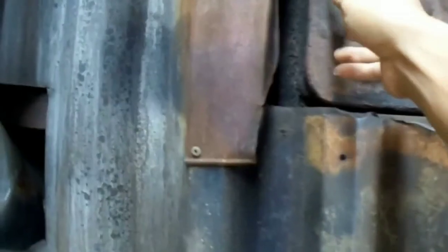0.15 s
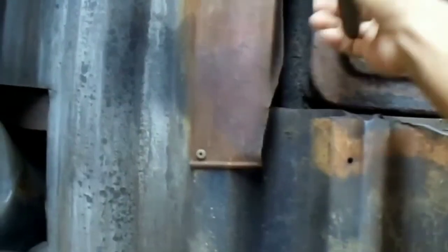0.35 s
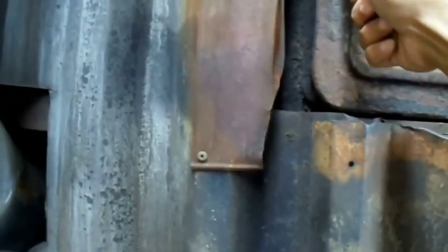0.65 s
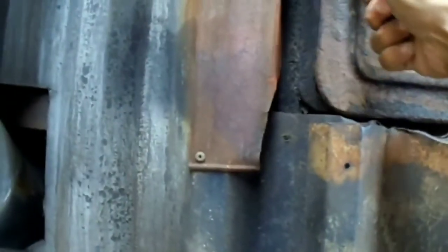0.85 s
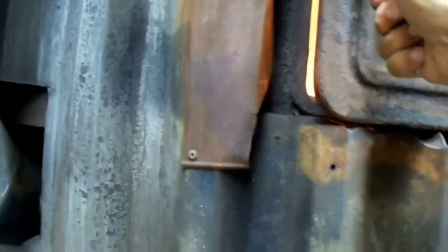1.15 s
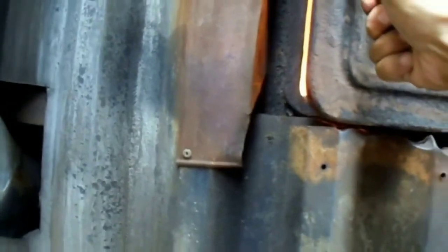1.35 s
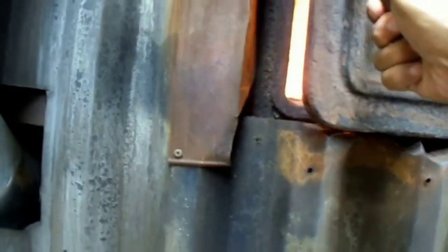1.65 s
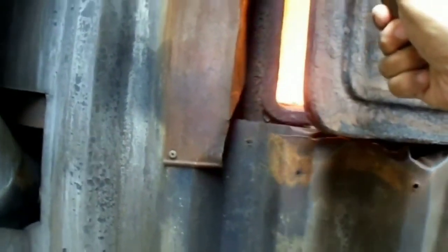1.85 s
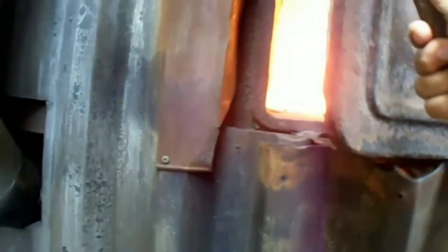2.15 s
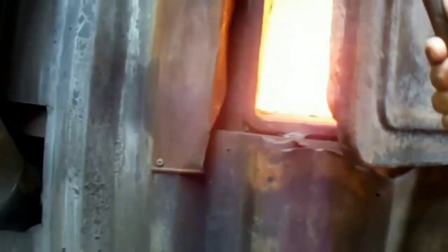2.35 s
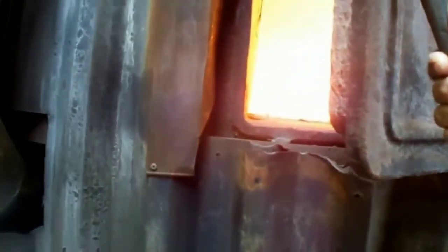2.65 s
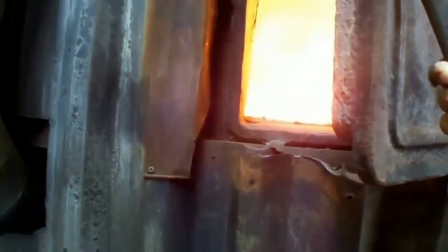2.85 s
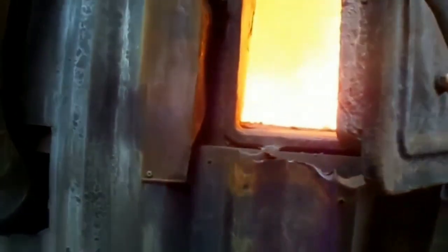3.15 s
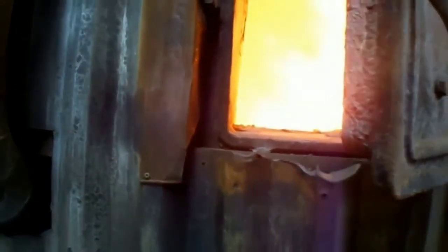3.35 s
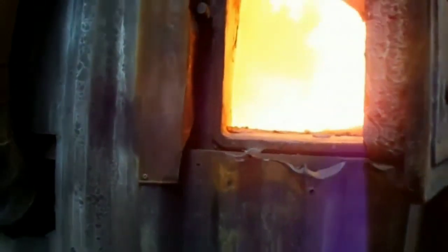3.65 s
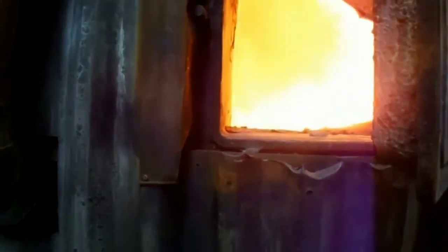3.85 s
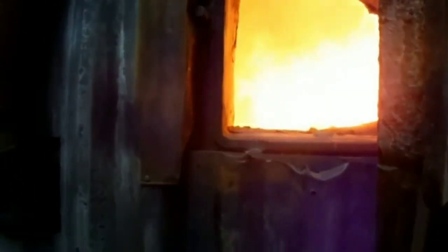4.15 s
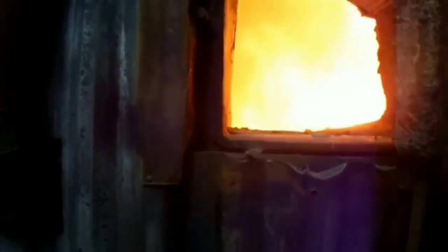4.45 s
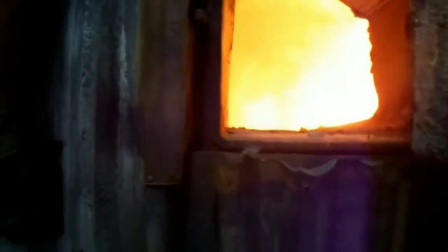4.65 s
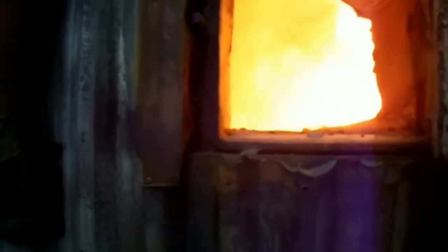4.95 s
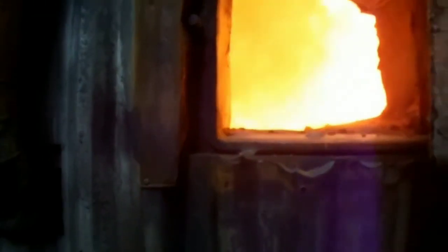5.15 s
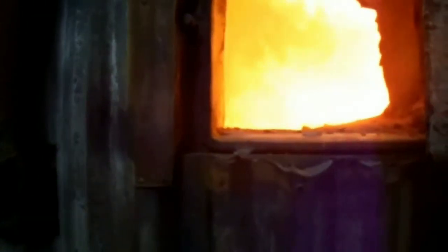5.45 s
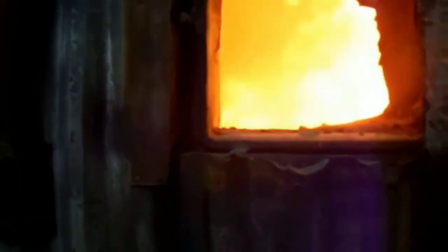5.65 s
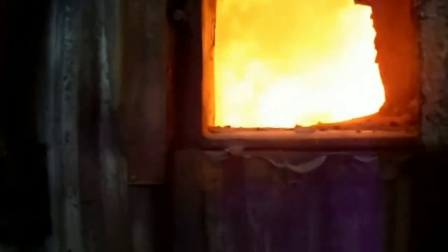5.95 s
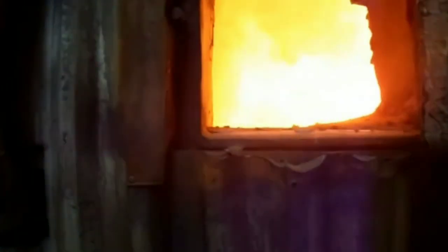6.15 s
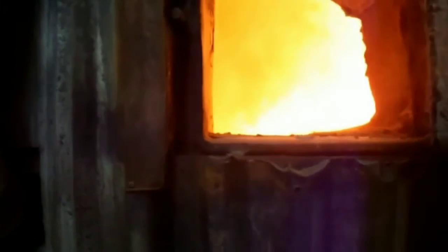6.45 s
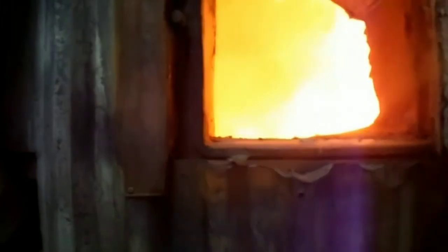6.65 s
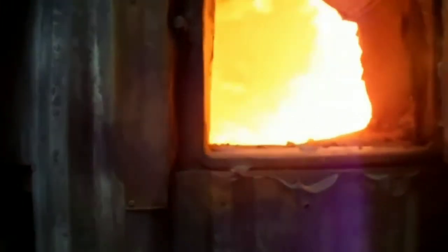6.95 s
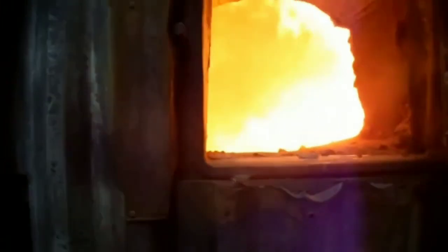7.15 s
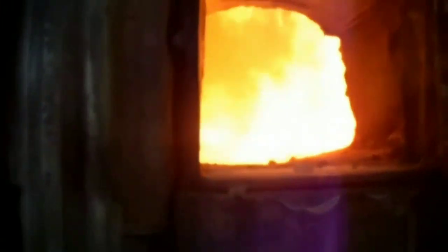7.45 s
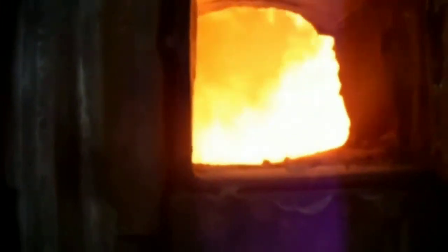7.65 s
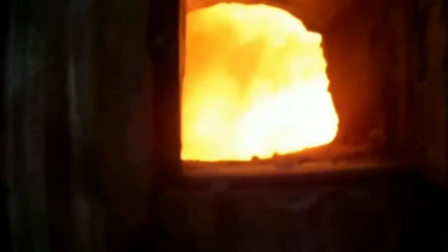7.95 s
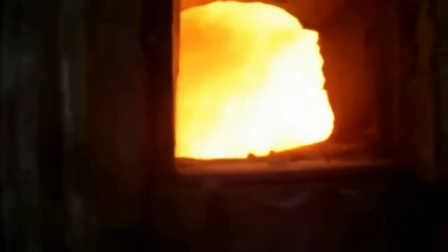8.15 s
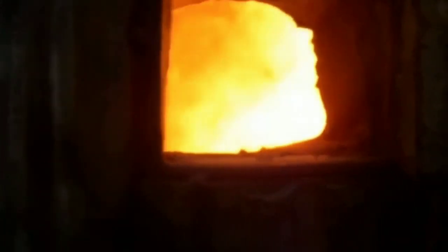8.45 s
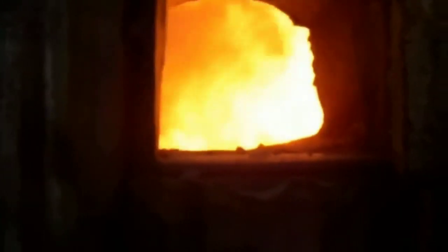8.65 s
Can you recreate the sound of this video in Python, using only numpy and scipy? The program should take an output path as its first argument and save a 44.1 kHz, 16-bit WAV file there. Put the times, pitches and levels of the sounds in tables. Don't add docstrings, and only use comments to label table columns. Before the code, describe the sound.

Close handheld pickup beside an industrial furnace: continuous rushing air and fans, low hum, piercing but quiet rotor whine. The iron door scrapes and groans softly, then bangs in clustered, distorted metallic blows with a rattling handle and short hard reverberation. The plant noise ducks under the blows and swells back. Finally the roar continues with isolated snaps and a small flurry of coal crackles.

```python
import sys
import numpy as np
from scipy import signal
from scipy.io import wavfile
from scipy.ndimage import uniform_filter1d

SR = 44100
rng = np.random.default_rng(int(sys.argv[2]) if len(sys.argv) > 2 else 0)


def boost(x):
    u = np.asarray(x, float) / 20
    return 10 ** u


def transcribe(signal):
    frames = np.atleast_2d(signal).T
    limited = np.clip(frames, -1, 1)
    pcm = np.round(limited * 32767).astype(np.int16)
    wavfile.write(sys.argv[1], SR, pcm)


N = 388080

# (time [s], body level [dB], edge level [dB], rattle T60 [s])
BLOWS = [(2.163, -12, -7.5, 0.11), (2.187, -7, -8, 0.11), (2.202, -25, -12.5, 0.057),
         (2.351, -11, -18, 0.18), (2.358, -6, -7.5, 0.17), (2.392, -11, -16, 0.15), (2.444, -11, -5, 0.17),
         (2.457, -7.5, -8, 0.15), (3.143, -25, -29.5, 0.15), (3.225, -19, -13.5, 0.2),
         (3.241, -2.5, -6, 0.17), (3.276, -7.5, -22, 0.14), (3.31, -19.5, -24.5, 0.7),
         (3.54, -28, -29, 0.15), (3.623, -3.5, -6, 0.14), (3.633, -8.5, -15, 0.15),
         (3.695, -21, -27.5, 0.39), (3.77, -20.5, -28.5, 0.33), (4.531, -8, -12, 0.4),
         (4.565, -14.5, -5.5, 0.28), (4.582, -7.5, -12, 0.3), (4.625, -18, -23, 0.13),
         (4.723, -17, -24.5, 0.14)]
# (frequency [Hz], width [Hz], level [dB])
BODY_MODES = [(153, 30, -8), (201, 73, -2.5), (393, 83, -2), (484, 220, -3), (560, 120, 3), (680, 150, -7),
              (694, 320, -1.5), (809, 140, 0), (915, 120, -9.5), (1052, 95, -6), (324, 53, -11.5),
              (1180, 580, -10.5)]
# (frequency [Hz], width [Hz], level [dB])
EDGE_MODES = [(1416, 300, 4.5), (1690, 190, 3.5), (1950, 220, 9.5), (2220, 120, 9.5), (2496, 310, 8),
              (2880, 840, 0), (3085, 800, -5.5), (3400, 540, 3.5), (3660, 240, 3), (4030, 180, 1.5),
              (4370, 490, -10), (4680, 1200, -6.5), (4850, 390, -14.5), (5230, 450, -14.5),
              (6000, 400, -39)]
# (time [s], level [dB], frequency [Hz])
THUDS = [
    (2.453, -27, 40),
    (3.246, -27, 65),
    (4.566, -19, 36),
    (4.575, -29, 205),
]


def door():
    out = np.zeros(N)
    for s, body_db, edge_db, t60 in BLOWS:
        body = struck(BODY_MODES, detune=0.035, uneven_db=4.5)
        add(out, s, boost(body_db) * signal.fftconvolve(burst(t60), body))
        edge = struck(EDGE_MODES, detune=0.023, uneven_db=-0.5)
        add(out, s, boost(edge_db) * signal.fftconvolve(burst(t60), edge))
    t = np.arange(16000) / SR
    for s, db, hz in THUDS:
        envelope = boost(db - 60 * t / 0.14) * (1 - np.exp(-t / 0.0075))
        add(out, s, envelope * np.sin(2 * np.pi * hz * t))
    return out


# (time [s], frequency [Hz], level [dB])
RINGS = [(2.163, 694, -5.5), (2.187, 697, -0.5), (2.358, 660, -11), (2.39, 560, -13), (2.46, 549, -17.5),
         (2.444, 1887, -12), (2.457, 2196, -14.5), (3.142, 281, -28), (3.225, 790, -8), (3.241, 570, -13.5),
         (3.276, 393, -7.5), (3.624, 1970, -8.5), (3.633, 520, -11.5), (4.531, 610, -9), (4.54, 794, -9.5),
         (4.58, 700, -12.5), (4.565, 2223, -12), (4.582, 2100, -9.5), (4.624, 1927, -16.5)]


def rings(t60_s=.19, reference_hz=700, slope=0.55):
    out, t = np.zeros(N), np.arange(16000) / SR
    for s, hz, db in RINGS:
        decay_db = 60 * t / t60_s * (hz / reference_hz) ** slope
        envelope = boost(db - decay_db) * (1 - np.exp(-t / 0.00059))
        add(out, s, envelope * np.sin(2 * np.pi * hz * t))
    return out


# (frequency [Hz], width [Hz], level [dB])
HINGE_MODES = [(199.5, 44, 2.5), (253.6, 55, 1.3), (318, 75, -1), (392.6, 110, -3.5), (560, 320, -6.5),
               (700, 63, -15), (900, 400, -11)]
# (time [s], length [s], frequency [Hz])
MOANS = [
    (1.56, .3, 312),
    (1.66, .2, 195),
    (1.87, .15, 620),
    (2.07, .1, 290),
    (2.9, .12, 270),
    (3.15, .08, 280),
    (3.3, .3, 205),
    (3.66, .25, 245),
    (4.74, .08, 800),
]
MOANS_DB = [-24, -25.5, -25, -24.5, -29, -21.5, -28, -34, -38]


def hinge(slips_per_s=1500):
    slips = (rng.random(N) < slips_per_s / SR) * rng.standard_normal(N)
    out = load() * evened(signal.oaconvolve(slips, struck(HINGE_MODES))[:N])
    for (s, length, hz), db in zip(MOANS, MOANS_DB):
        rub = rng.standard_normal(SR)[:round(length * SR)]
        rub = rub * signal.windows.tukey(len(rub), .6)
        add(out, s, boost(db) * signal.fftconvolve(rub, struck([(hz, 60, 0)])))
    return out


# (start [s], held [s], grind level [dB])
PUSHES = [
    (1.04, 0.032, -24.5),
    (1.88, .34, -25),
    (2.95, 0.076, -39),
    (3.181, .14, -24),
    (3.42, .17, -27),
    (3.68, 0.22, -33),
    (4.721, 0.062, -24),
]


def load(rise_db_per_s=53, fall_db_per_s=34):
    t = np.arange(N) / SR
    total = np.zeros(N)
    for s, held, db in PUSHES:
        before = np.maximum(s - t, 0)
        after = np.maximum(t - s - held, 0)
        total += boost(db - rise_db_per_s * before - fall_db_per_s * after)
    return total


# (time [s], level [dB], frequency [Hz])
LATCH = [
    (2.162, -18, 3270),
    (2.203, -44, 5200),
    (2.361, -16.5, 4640),
    (3.226, -23, 3265),
    (3.277, -19.5, 4560),
    (3.64, -22, 4600),
    (4.533, -20.5, 4350),
    (4.564, -3, 5040),
    (4.566, -10, 3800),
    (4.597, -14.5, 4660),
]


def latch():
    out = np.zeros(N)
    for s, db, hz in LATCH:
        tick(out, s, db, hz, 0.2 * hz, 0.046)
    return out


# (time [s], level [dB], frequency [Hz])
SNAPS = [(2.164, -5, 2610), (2.447, -6, 2100), (4.539, -6.5, 900), (2.199, -14, 5200), (3.229, -16, 3560),
         (3.277, -17, 4800), (6.198, -14, 2430), (6.198, -19, 4950), (6.199, -27, 3600), (7.478, -21, 3030),
         (7.629, -21, 4330), (7.856, -14, 3680)]


def snaps():
    out = np.zeros(N)
    for s, db, hz in SNAPS:
        tick(out, s, db, hz, 0.23 * hz, 0.0086)
    return out


# (time [s], level [dB], frequency [Hz], T60 [s])
LUMPS = [(4.179, -38, 3500, 0.028), (4.312, -30, 3170, 0.065), (4.328, -28, 4400, 0.03),
         (4.392, -33, 3900, .034), (7.427, -20.5, 3360, 0.055), (7.437, -14.5, 600, .05),
         (7.44, -19.5, 1500, 0.11), (7.63, -23.5, 3900, .07), (7.631, -21, 1500, 0.037),
         (7.632, -16, 600, 0.055), (7.671, -27, 3630, .06), (7.734, -27, 4850, 0.025),
         (7.84, -21, 4020, .04), (7.85, -19.5, 4370, 0.085), (7.959, -29.5, 4240, .063),
         (8.553, -19.5, 3980, 0.029)]


def lumps():
    out = np.zeros(N)
    for s, db, hz, t60 in LUMPS:
        tick(out, s, db, hz, .7 * hz, t60)
    return out


# (time [s], level [dB], frequency [Hz])
CLINKS = [
    (.981, -26, 4570),
    (.99, -14, 700),
    (.994, -30, 3400),
    (1.745, -23.5, 2520),
    (7.446, -27, 4820),
    (7.853, -23, 3600),
]


def clinks():
    out = np.zeros(N)
    for s, db, hz in CLINKS:
        tick(out, s, db, hz, 290, .07)
    return out


TONE_HZ = [100.3, 1460, 1582, 1618, 1753, 1809, 1534, 1949, 2024, 2927, 1206, 4000]
# (level [dB rms], waver [dB], wander [Hz])
TONES = [(-33, 0.3, 0.31), (-40, 3.1, 0.32), (-40, 2.2, 0.74), (-42.5, -3.5, 0.9), (-44.5, -1.5, 0.62),
         (-54, 1, 1.1), (-58, 6, 0.7), (-55.5, 9, .8), (-58.5, 5, 0.73), (-45, 1, 2.5), (-44.5, 1.5, 4.0),
         (-54.5, 1.5, 0.91)]
# (time [s], frequency [Hz])
WHINE_HZ = [(0, 1704), (.7, 1704), (1.4, 1702.5), (2, 1702), (4.5, 1703), (5.2, 1700), (5.8, 1702),
            (6.6, 1705), (7.2, 1705), (8.8, 1703)]
# (time [s], level [dB])
WHINE = [(0, -57), (.35, -32), (.7, -28.5), (1.1, -34), (1.4, -29.5), (2, -28.5), (2.6, -37), (3.1, -32.5),
         (4, -36.5), (4.5, -32.5), (5.1, -37.5), (5.45, -28), (6.3, -32), (6.5, -35.5), (6.8, -33),
         (7.2, -28), (7.5, -41.5), (8.8, -60)]


def machines():
    lines = np.array([tone(hz, *row) for hz, row in zip(TONE_HZ, TONES)])
    sink_db = -7 * np.exp(-((np.arange(N) / SR - 4.9) / 1.6) ** 4)
    lines[1] *= boost(sink_db)
    return lines.sum(0) + tone(follow(WHINE_HZ), follow(WHINE), .8, 0.18)


def tone(hz, db, waver_db, wander_hz):
    turns = np.cumsum(hz + wander_hz * drift(12)) / SR
    return np.sqrt(2) * boost(db + waver_db * drift(9)) * np.sin(2 * np.pi * turns)


# (frequency [Hz], level [dB per Hz])
RUSH = [(12, -27), (20, -6.5), (97, -4), (145, -5), (378, -7), (540, -5), (594, -5), (1220, -13.5),
        (1340, -14.5), (1620, -14), (1920, -16.5), (3020, -16), (4530, -27), (5350, -31), (6030, -48.5),
        (7840, -92), (13300, -120)]
# (frequency [Hz], width [Hz], lift [dB])
DUCTS = [(52, 11.4, 8), (199.8, 13, 7), (253.4, 9.9, 10.5), (300.7, 12, 5.5), (370, 17, 8.5), (467, 28, 3),
         (593.7, 16, 6), (1195, 53, 5), (1675, 74, 5), (2885, 300, -1), (3080, 32, 3.5)]


def rush(patchy_db=.9, swell_db=.6):
    frames, hz = N // 1024 + 5, np.fft.rfftfreq(4096, 1 / SR)
    a, b, patches = rng.standard_normal((frames, 2049, 3)).T
    patches = uniform_filter1d(patches, size=60, axis=0)
    patches = uniform_filter1d(patches, size=4, axis=1)
    patches = evened(patches).clip(-2, 2)
    colour_db = read(RUSH, hz)
    for f, width, db in DUCTS:
        colour_db = colour_db + db / (1 + (2 * (hz - f) / width) ** 2)
    z = (a + 1j * b) * boost(colour_db[:, None] + patchy_db * patches)
    noise = signal.istft(z, nperseg=4096, noverlap=3072)[1][:N]
    return boost(-22 + swell_db * drift(7.8)) * evened(noise)


# (frequency [Hz], T60 [s])
HALL = [(100, 0.35), (400, 0.22), (1000, 1), (2500, 0.58), (6000, 0.21)]


def hall(x):
    hz, t, z = signal.stft(rng.standard_normal(SR), SR, nperseg=256)
    decay_db = -60 * t / read(HALL, hz)[:, None]
    tail = signal.istft(z * boost(decay_db), SR, nperseg=256)[1]
    tail *= np.minimum(np.arange(len(tail)) / (0.0053 * SR), 1)
    return boost(-12) * signal.fftconvolve(x, tail / np.linalg.norm(tail))[:N]


# (time [s], depth [dB])
DUCKS = [
    (2.17, -17),
    (2.47, -15.5),
    (3.26, -9.5),
    (3.65, -16),
    (4.6, -11.5),
]


def gain_db(lag_s, recover_s):
    t = np.arange(N) / SR
    down = np.min([db * np.exp(-abs(t - s) / recover_s) * (t > s) for s, db in DUCKS], axis=0)
    keep = np.exp(-1 / (lag_s * SR))
    return signal.lfilter([1 - keep], [1, -keep], down)


def struck(modes, detune=0., uneven_db=0.):
    hz, width, db = np.transpose(modes)[:, :, None]
    shift, level = rng.standard_normal((len(modes), 2, 1)).transpose(1, 0, 2)
    f = abs(np.fft.fftfreq(8192, 1 / SR))
    offset = 2 * (f - hz * (1 + detune * shift)) / width
    power = (boost(db + uneven_db * level) / (1 + offset ** 2)) ** 2
    radiation = f ** 2 / (f ** 2 + hz.min() ** 2 / 4)
    log_gain = np.log(power.sum(0) * radiation + 1e-12) / 2
    shape = np.fft.ifft(np.exp(np.conj(signal.hilbert(log_gain)))).real[:4096]
    return shape / np.linalg.norm(shape)


def burst(t60, rise=0.0016):
    t = np.arange(16000) / SR
    return rng.standard_normal(16000) * (1 - np.exp(-t / rise)) * boost(-60 * t / t60)


def tick(out, s, db, hz, width, t60):
    contact = burst(t60, rise=t60 / 55)
    add(out, s, boost(db) * signal.fftconvolve(contact, struck([(hz, width, 0)])))


def add(mix, s, sound):
    part = mix[round(s * SR):][:len(sound)]
    part += sound[:len(part)]


def evened(x):
    return x / np.sqrt(np.mean(x ** 2) + 1e-20)


def read(points, hz):
    f, value = np.transpose(points)
    return np.interp(np.log(hz + 1), np.log(f + 1), value)


def follow(rows):
    s, value = np.transpose(rows)
    return np.interp(np.arange(N) / SR, s, value)


def drift(top_hz):
    t, slow = np.arange(0, N, 64) / SR, 0
    for f in np.geomspace(top_hz / 20, top_hz, 16):
        slow = slow + np.sin(2 * np.pi * (f * t + rng.random())) / np.sqrt(f)
    return np.interp(np.arange(N) / SR, t, evened(slow))


def scene():
    iron, ringing = door(), rings()
    top_cut = signal.butter(N=6, Wn=5300, fs=SR, output="sos")
    grit = signal.sosfilt(top_cut, latch() + snaps() + lumps() + clinks())
    plant = machines() + rush()
    bass = signal.sosfiltfilt(signal.butter(N=3, Wn=130, fs=SR, output="sos"), plant)
    ducked_bass = bass * boost(1.2 * gain_db(lag_s=.03, recover_s=0.57))
    ducked_rest = (plant - bass) * boost(gain_db(lag_s=0.21, recover_s=0.48))
    echo = hall(iron + grit + .2 * ringing)
    return (iron + ringing + hinge() + grit + ducked_bass + ducked_rest + echo)[None]


def roll_off(x):
    return signal.sosfilt(signal.butter(12, 15830, fs=SR, output="sos"), x)


def record(dry):
    headroom, ceiling = 1.57, .985
    capsule = headroom * np.tanh(dry / headroom)
    treble_cut = signal.firwin(255, 6005, window=("kaiser", 9), fs=SR)
    dull = signal.oaconvolve(capsule, treble_cut[None], "same")
    clipped = np.clip(dull + .0016, -ceiling, ceiling)
    hiss = boost(-86.5) * rng.standard_normal(N)
    live = np.clip((np.arange(N) / SR - .016) / .0015, 0, 1)
    return roll_off((clipped + hiss) * live)


dry = scene()
out = record(dry)
transcribe(out)
```